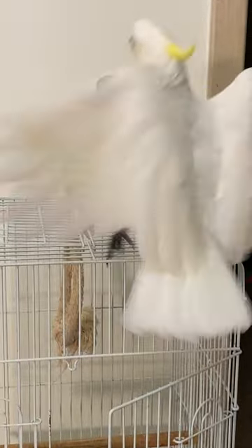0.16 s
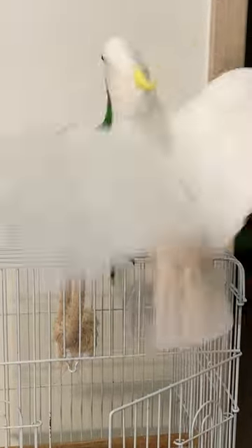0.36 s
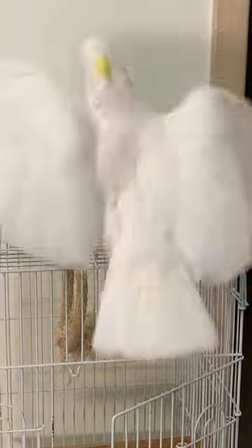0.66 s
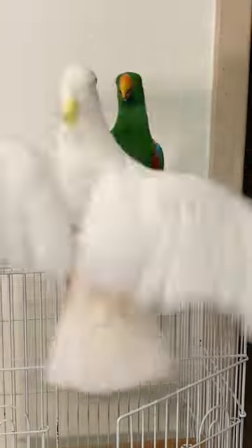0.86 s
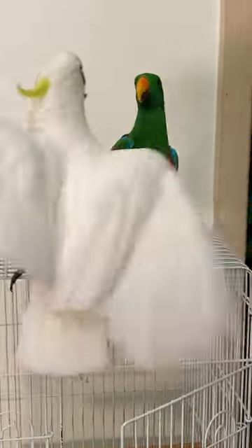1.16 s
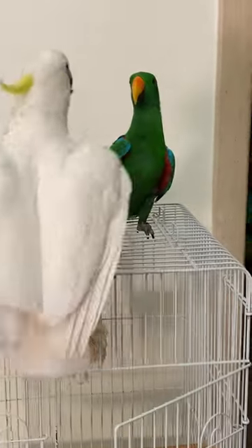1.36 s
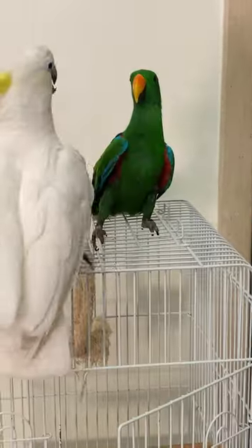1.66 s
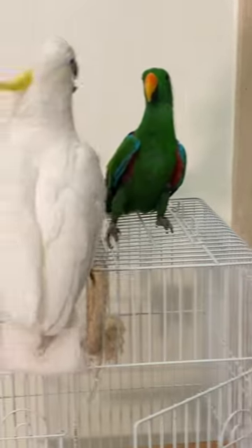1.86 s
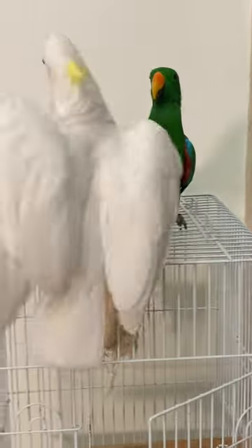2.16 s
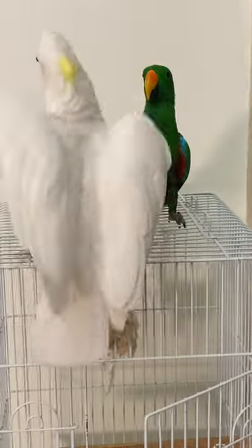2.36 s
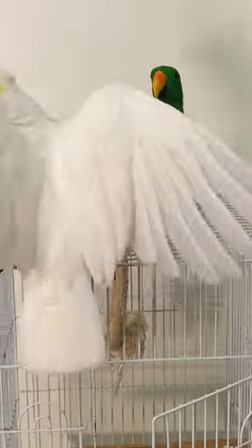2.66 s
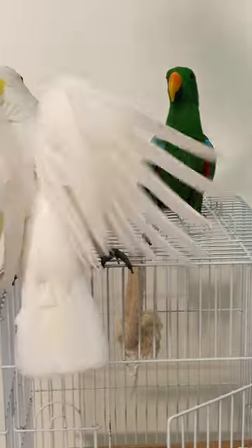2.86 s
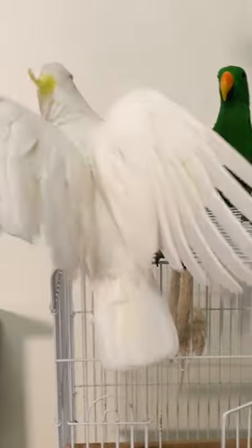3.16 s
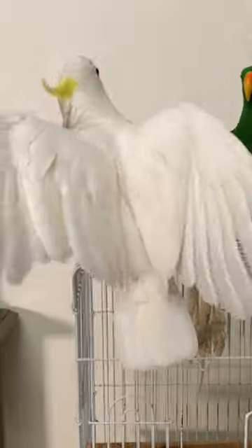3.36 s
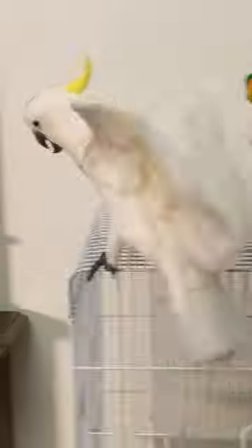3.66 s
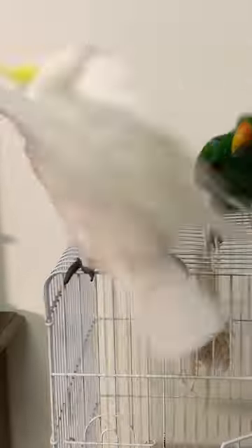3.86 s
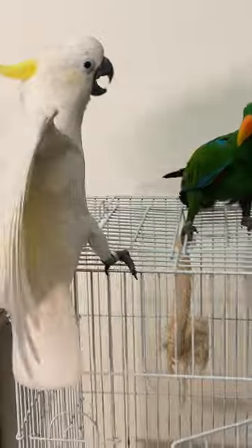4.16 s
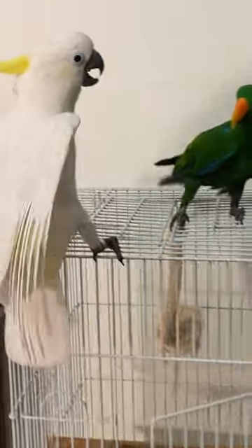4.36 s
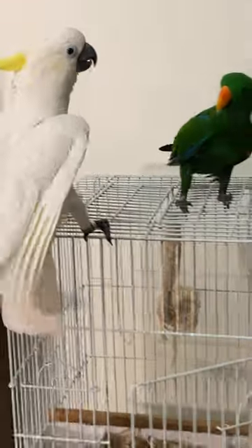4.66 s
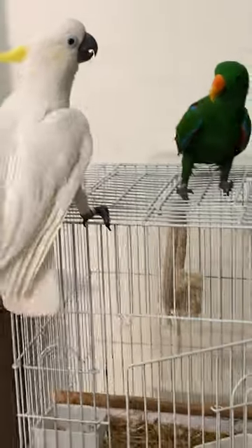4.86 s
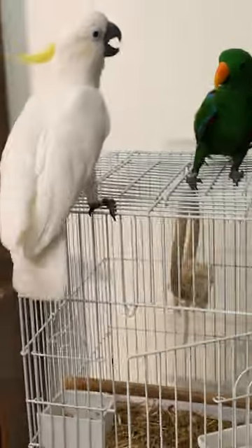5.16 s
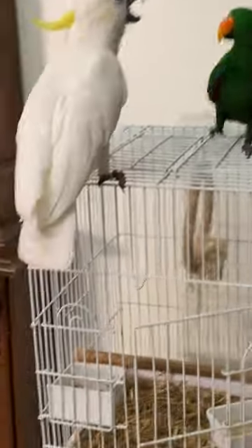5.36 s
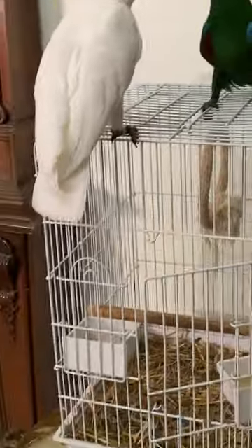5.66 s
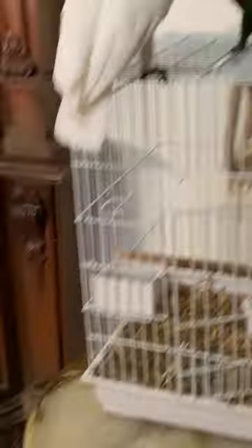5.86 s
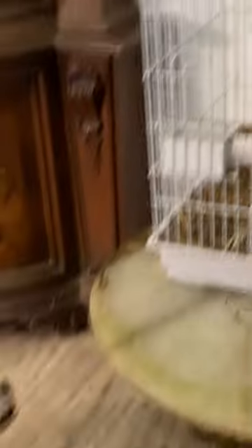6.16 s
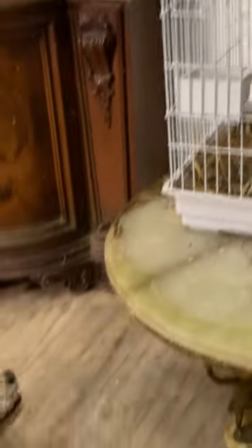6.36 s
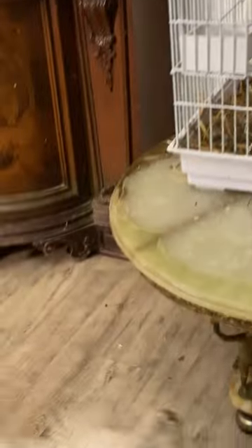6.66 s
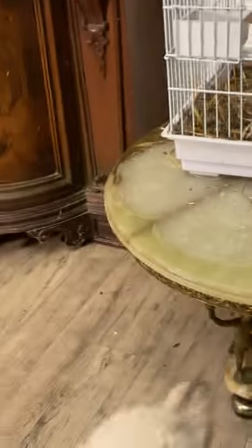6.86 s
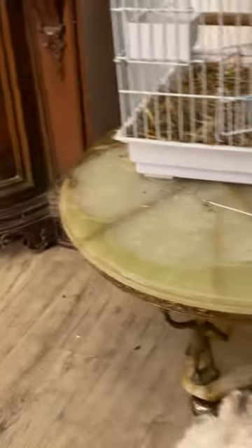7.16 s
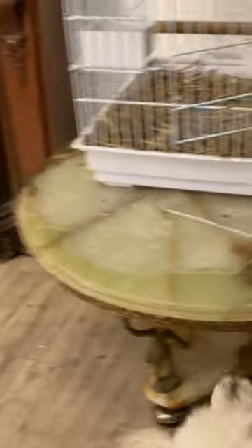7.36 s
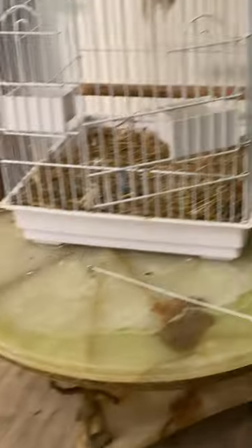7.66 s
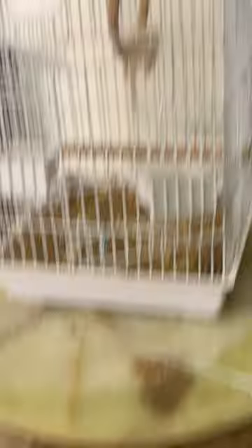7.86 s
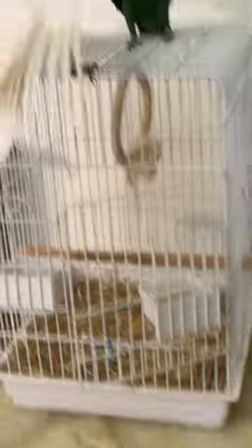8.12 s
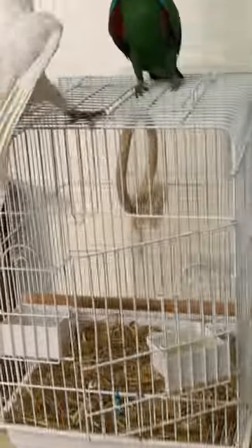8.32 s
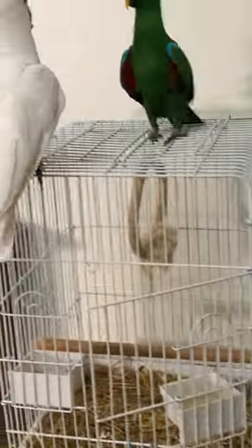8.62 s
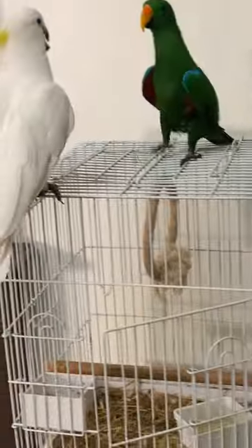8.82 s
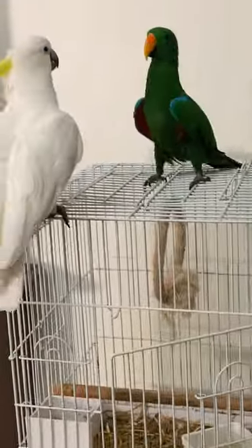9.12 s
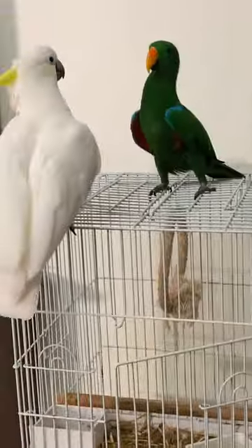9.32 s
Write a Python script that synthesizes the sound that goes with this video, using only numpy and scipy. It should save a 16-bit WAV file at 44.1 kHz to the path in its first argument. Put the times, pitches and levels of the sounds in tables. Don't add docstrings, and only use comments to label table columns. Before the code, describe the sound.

A large parrot on a wire cage screeches harshly in two bouts, with tiny dog yips in the pause and one last clearer scream.

```python
import sys
import numpy as np
from scipy import signal
from scipy.fft import rfft, irfft, next_fast_len
from scipy.io import wavfile
from scipy.ndimage import uniform_filter1d

SR = 44100
rng = np.random.default_rng(int(sys.argv[2]) if len(sys.argv) > 2 else 0)


def level_to_linear(level):
    exponent = np.asarray(level, float) / 20
    return 10 ** exponent


def dump(signal):
    limited = np.clip(np.atleast_2d(signal).T, -1, 1)
    pcm = np.round(limited * 32767).astype(np.int16)
    wavfile.write(sys.argv[1], SR, pcm)


N = 418509

# frequency_hz, density_db [dB per Hz]
HUSH_SPECTRUM = [(30, -45), (60, -12.5), (120, -3.5), (300, -6), (600, -8.5), (1000, -15.5), (2000, -14.5),
                 (4000, -19), (8000, -23), (15000, -28.5)]
# time_s, level_db
HUSH_LEVEL = [(0, -65), (2.5, -69), (4.2, -74), (7, -61.5), (9.2, -71.5), (9.49, -80.5)]
HUM_HZ, HUM_DB = 50.4, -71.5

# start_s, length_s, opening_db, push_s [after the start], push_db
SCREECHES = [ (0.088, 0.33697, -26, .32, -16), (0.56, 0.27842, -23.5, 0.26, -17.5),
             (1.03, 0.33704, -23, 0.092, -24.5), (1.55, 0.55622, -27.5, 0.4635, -22),
             (2.265, 0.4032, -20.5, 0.038, -20), (2.815, 0.41065, -23.5, 0.24, -22.5),
             (3.53, 0.53465, -25, 0.35007, -17.5), (5.19, 0.36793, -18, .32, -19),
             (5.74, 0.25057, -20.5, 0.17, -18), (6.14, 0.34837, -21.5, 0.4, -16.5),
             (6.62, 0.44704, -24.5, 0.28, -20.5), (7.185, 0.3703, -20.5, 0.097, -19),
             (7.68, 0.35889, -21.5, .26, -18.5)]
# [per s, lower voice]
VOICES = [ (0.029, 2030, 2600, -28.5, -0.5), (0.016, 2010, 2550, -26, 1), (0.026, 2060, 2620, -25, -18),
          (0.0084, 2120, 2600, -18, 5), (0.024, 2120, 2700, -17, -18), (0.019, 2140, 2950, -21.5, 0),
          (.045, 2200, 2700, -16.5, -10.5), (0.07757, 2130, 2880, -23, -15),
          (.022, 2180, 1900, -24.5, -8.5), (0.032, 2130, 2400, -7, -52.5), (0.017, 2080, 2300, -20, -5.5),
          (0.026, 2170, 2200, -21.5, -8.5), (0.0505, 2200, 2750, -13, -26)]
# chest_db [under 900 Hz], rasp_db [over 4 kHz], pipe_hz, pipe_db
COLOURS = [(4.5, -0.0147, 3900, -7.5), (9, 4.1447, 2600, 1.5), (6.5, -0.0246, 4050, -3.5),
           (2.5, 0.2614, 4100, -5), (1.713, -2, 3800, -5), (-0.16, -1.3431, 4200, -1.5),
           (0, 0.9364, 4150, 0.5), (-1.6482, -1.42, 4100, 1.5), (2.7626, 0.9178, 3900, -1.5),
           (4.5, 2.43, 4050, 0), (5, 1.8216, 3900, -7.5), (2.5, 2.5, 4150, -7.5), (0, 2.5, 4072, 2.5),
           (-1.5, 0.3087, 4070, -4)]
# frequency_hz, density_db [dB per Hz]
THROAT = [(150, -48.5), (300, -30), (500, -22.5), (800, -9.5), (1250, -10), (1650, -9), (1950, -7),
          (2800, -0.5), (3600, -6.5), (4200, -13), (5000, -17), (6000, -15), (9000, -18.5), (15500, -42)]
ONSET_DB, PUSH_POWER, SAG_DB_PER_S, RELEASE_S, RELEASE_DB = -13, 3.9306, -16.5, 0.05065, -13.5
HOP_S = 0.065
UPPER_HOP_HZ, BEAK_HOP_HZ, LOWER_HOP_HZ = 84.929, 170.03, 39.907
LOWER_HZ = 1169.5
SECOND_DB, SECOND_FADE_DB = -6.5, -8.5
BEAK_DB, PARTIAL_SWING_DB = -11, 2.5
SLACK_DB, SLACK_S = 10.5, 0.034

# start_s, peak_db, pitch_hz
CLUCKS = [(0.093, -37, 449.6), (0.79, -26, 763.6), (1.565, -36, 409.4), (2.104, -37.5, 420.3),
          (2.271, -35.5, 392.3), (2.819, -33, 420.5), (3.544, -34.5, 406), (5.2, -34, 524.6),
          (5.234, -27.5, 551.8), (5.744, -40, 371.2), (6.148, -36, 384.5), (8.367, -47, 552.4)]
# start_s, peak_db, pitch_hz
WINGS = [(1.053, -51.5, 91.83), (1.451, -51, 96.97), (1.582, -44.5, 119.5), (2.029, -58, 145.1),
         (2.666, -46, 121.3), (2.834, -61, 145.1), (3.062, -43.5, 130), (3.524, -45.5, 191),
         (3.796, -48.5, 96.9), (4.588, -53, 110.8), (5.32, -47.5, 185.5), (5.593, -57.5, 116),
         (6.312, -46.5, 128.5), (6.722, -50.5, 106.8), (7.096, -51, 105.9), (7.201, -55, 182.2),
         (7.9, -66.5, 173.6)]

# start_s, length_s, effort_db, top_hz, upper_db [orders above the second]
YIPS = [
    (4.495, .085, -44, 600, 8),
    (5.0, .056, -40, 542, 5),
]
# multiple [of the pitch], level_db
YIP_ORDERS = [(1, 3), (2, -5.5), (3, -22), (4, -21.5), (5, -27), (6, -25.5), (7, -40.5), (8, -49),
              (9, -56.5)]
YIP_START_HZ, YIP_RISE, YIP_ATTACK_S, YIP_FADE_DB = 450.2, 0.22, 0.014, -17

# start_s, peak_db
CLAWS = [
    (4.497, -48),
    (4.532, -43),
    (4.622, -50),
    (5.24, -37.5),
    (7.69, -34.5),
]

# time_s, effort_db, lower_db [lower voice re effort]
SCREAM_BREATH = [(8.345, -42, -15), (8.362, -40.5, -7.5), (8.398, -29, 4.5), (8.5, -28.5, -16),
                 (8.601, -24.5, -39), (8.683, -28.5, -11.5), (8.72, -23.5, -21.5), (8.79, -24.5, -15.5),
                 (8.92, -38.5, -9)]
# time_s, pitch_hz
SCREAM_PITCH = [(8.345, 980), (8.4, 1105), (8.55, 1060), (8.655, 995), (8.695, 1038), (8.73, 1010),
                (8.77, 1024), (8.835, 990), (8.865, 1032)]
# time_s, roughness [0-1]
SCREAM_ROUGHNESS = [(8.345, .85), (8.4, .55), (8.55, .56), (8.64, .42), (8.695, .18), (8.85, .13),
                    (8.885, .3), (8.92, .55)]
# time_s, pitch_hz, level_db [re effort]
SCREAM_WHISTLE = [(8.345, 5550, -22.5), (8.42, 5704, -9), (8.62, 6060, -13), (8.69, 6033, -20.5),
                  (8.92, 6140, -36.5)]
DROP_AT_S, DROP_HZ_PER_S = 8.876, 11500

# frequency_hz, t60_s
ROOM_DECAY = [(250, 0.42), (550, 1), (1000, 0.74365), (1700, 0.73777), (4600, 0.59582), (9000, 0.4676),
              (15000, 0.31964)]
# frequency_hz, level_db
PORT_SUM = [(100, -1.5), (4300, 0.5), (5000, 0.5), (7000, -5), (8200, -14), (9200, -28.5), (11600, -14),
            (12600, -14), (15000, -6.5)]
# frequency_hz, level_db, likeness [to the sum, 0-1], lead [turns]
PORT_DIFFERENCE = [(170, -34.5, .1, .15), (330, -16, .6, .1), (550, -7, .8, .05), (863.03, -4, .45, 0),
                   (1200, 1.9522, 0.6, -0.19), (1500, -3, .3, -.28), (1750, -9.5, .15, .25),
                   (2100, -12, .85, .25), (2700, -5.5, 1, .25), (3600, -13, .87, .25),
                   (4500, -2.5, .93, .25), (5200, 1, 1, 0.251), (11000, -3.5, .9, .25),
                   (15000, -8.5, .6, .25)]


def evened(x):
    return x / np.sqrt(np.mean(x ** 2) + 1e-20)


def read(points, hz, axis=1):
    table = np.transpose(points)
    return np.interp(np.log(hz + 1), np.log(table[0] + 1), table[axis])


def curves(rows):
    s, *columns = np.transpose(rows)
    t = np.arange(s[0], s[-1], 1 / SR)
    return [np.interp(t, s, column) for column in columns]


def coloured(x, gain):
    size = next_fast_len(len(x) + 2048)
    spectrum = rfft(x, size) * gain(np.fft.rfftfreq(size, 1 / SR))
    return irfft(spectrum, size)[:len(x)]


def add(mix, s, sound):
    part = mix[round(s * SR):][:len(sound)]
    part += sound[:len(part)]


def wander(count, hz):
    r = np.exp(-2 * np.pi * hz / SR)
    drift = signal.lfilter([1], [1, -2 * r, r * r], rng.standard_normal(count + 4000))
    return evened(drift[4000:])


def background():
    hush = np.array([coloured(rng.standard_normal(N), lambda hz: level_to_linear(read(HUSH_SPECTRUM, hz)))
                     for _ in range(2)])
    level_db = np.interp(np.arange(N) / SR, *np.transpose(HUSH_LEVEL)) + 1.4 * wander(N, 3)
    hum_turns = np.cumsum(HUM_HZ + 3.0 * wander(N, 3)) / SR
    hum = np.cos(2 * np.pi * hum_turns) * level_to_linear(HUM_DB + 1.8 * wander(N, 3))
    return level_to_linear(level_db) * evened(hush) + hum


def effort(t, length, opening_db, push_s, push_db, attack_s):
    swell_db = opening_db + (push_db - opening_db) * np.minimum(t / push_s, 1) ** PUSH_POWER
    attack_db = ONSET_DB / (1 + (t / attack_s) ** 2.9476)
    sag_db = SAG_DB_PER_S * np.maximum(t - push_s, 0)
    ending_db = RELEASE_DB * np.maximum(1 - (length - t) / RELEASE_S, 0)
    return swell_db + attack_db + sag_db + ending_db


def hops(t, centre_hz, spread_hz):
    stay, step = rng.random((2, 24))
    ends_s = np.cumsum(HOP_S * (0.3 + 1.4 * stay))
    which = np.minimum(np.searchsorted(ends_s, t), 23)
    held_hz = centre_hz + spread_hz * np.sqrt(12) * (step[which] - 0.5)
    return uniform_filter1d(held_hz, size=300)


def syrinx(hz, rough, jitter, flutter_db, odd=1):
    count = len(hz)
    rough = np.clip(rough, 0, 1)
    slips = jitter * rough * wander(count, 60) + 0.004 * wander(count, 25)
    turns = np.cumsum(hz * (1 + slips)) / SR
    pulses = sum(odd ** (k % 2) * np.cos(2 * np.pi * k * turns + k * k / 2) for k in range(2, 15))
    beat = 2 * np.pi * np.cumsum(hz * (0.2 + 0.05 * wander(count, 15.823))) / SR
    pulses = pulses * (1 + 1.8 * rough * (np.cos(beat) + 0.7 * np.cos(2 * beat)))
    puffs = (0.4 + np.exp(-(turns % 1) / 0.5)) * rng.standard_normal(count)
    flutter = level_to_linear(flutter_db * rough * wander(count, 140))
    return evened(flutter * (np.sqrt(1 - rough ** 2) * evened(pulses) + rough * evened(puffs)))


def resonate(x, hz, width_hz):
    turn = np.exp(2j * np.pi * np.cumsum(hz * np.ones(len(x))) / SR)
    r = np.exp(-np.pi * width_hz / SR)
    return 2 * (turn * signal.lfilter([1 - r], [1, -r], x / turn)).real


def throat(drive, chest_db=0, rasp_db=0, pipe_hz=4000, pipe_db=-20):
    def gain(hz):
        chest = chest_db / (1 + (hz / 950) ** 6)
        rasp = rasp_db / (1 + (4000 / (hz + 1)) ** 6)
        return level_to_linear(read(THROAT, hz) + chest + rasp)

    pipe = resonate(drive, pipe_hz, 440) + resonate(drive, 1.36 * pipe_hz, 380)
    return evened(coloured(drive + level_to_linear(pipe_db) * pipe, gain))


def whistle(hz, width_hz):
    turns = np.cumsum(hz + width_hz * wander(len(hz), 89.828)) / SR
    return evened(level_to_linear(4.4 * wander(len(hz), 50)) * np.cos(2 * np.pi * turns))


def screech(shape, voice, colour):
    attack_s, upper_hz, beak_hz, lower_db, fading_db = voice
    length = shape[0]
    t = np.arange(0, length, 1 / SR)
    effort_db = effort(t, *shape, attack_s)
    second_db = SECOND_DB + PARTIAL_SWING_DB * wander(len(t), 10) + SECOND_FADE_DB * t / length
    beak_db = BEAK_DB + PARTIAL_SWING_DB * wander(len(t), 10)
    lower_db = lower_db + PARTIAL_SWING_DB * wander(len(t), 10)
    lower_db = lower_db + SLACK_DB * np.exp(-t / SLACK_S) + fading_db * t

    tensing = 1 - 0.15 * np.exp(-t / 0.01)
    upper_hz = tensing * hops(t, upper_hz, UPPER_HOP_HZ)
    beak_hz = hops(t, beak_hz, BEAK_HOP_HZ)
    lower_hz = tensing * uniform_filter1d(hops(t, LOWER_HZ, LOWER_HOP_HZ), size=6000)

    rough = 0.62 + 0.11 * wander(len(t), 14)
    drive = syrinx(upper_hz / 2, rough, jitter=0.03, flutter_db=1.6, odd=0.72)
    beak = evened(resonate(drive, beak_hz, width_hz=300)) + level_to_linear(-1.5) * whistle(beak_hz, 80)
    sound = throat(drive, *colour) + level_to_linear(beak_db) * beak
    sound += level_to_linear(second_db) * whistle(upper_hz, 70)
    sound += level_to_linear(lower_db + 1.5) * whistle(lower_hz, 45)
    return level_to_linear(effort_db - 3.5) * sound * signal.windows.tukey(len(t), 0.06)


def puff(db, hz, cycles, glide):
    u = np.arange(0, cycles, hz / SR) / cycles
    hump = np.sin(np.pi * u ** 0.79) ** 2
    return level_to_linear(db) * hump * np.sin(2 * np.pi * cycles * (u + glide * (u * u - u)))


def cluck(db, hz):
    return sum(puff(db - 4.6 * k, hz * (k + 1), cycles=7.4 * (k + 1), glide=0.27) for k in range(4))


def wing_beat(db, hz):
    return puff(db - 3.5, hz, cycles=3.6, glide=-0.3)


def yip(length, top_db, top_hz, upper_db):
    t = np.arange(0, length, 1 / SR)
    hz = top_hz + (YIP_START_HZ - top_hz) / (1 + (t / (YIP_RISE * length)) ** 2.6)
    effort_db = top_db + YIP_FADE_DB * (t / length) ** 3
    turns = np.cumsum(hz * (1 + 0.013 * wander(len(t), 120))) / SR
    stack = sum(level_to_linear(db + upper_db * (k > 2)) * np.cos(2 * np.pi * k * turns) for k, db in YIP_ORDERS)
    breath = level_to_linear(upper_db - 24.5) * evened(throat(rng.standard_normal(len(t))))
    attack = np.sqrt(np.minimum(t / YIP_ATTACK_S, 1))
    return level_to_linear(effort_db) * (stack + breath) * attack * signal.windows.tukey(len(t), 0.12)


def claw(db):
    t = np.arange(0, 0.02, 1 / SR)
    bright = evened(np.diff(rng.standard_normal(len(t) + 1)))
    return level_to_linear(db - 60 * t / 0.012) * bright


def scream():
    effort_db, lower_db = curves(SCREAM_BREATH)
    rough, = curves(SCREAM_ROUGHNESS)
    high_hz, high_db = curves(SCREAM_WHISTLE)
    t = SCREAM_BREATH[0][0] + np.arange(len(rough)) / SR
    hz = np.interp(t, *np.transpose(SCREAM_PITCH))
    hz = hz - DROP_HZ_PER_S * np.maximum(t - DROP_AT_S, 0)
    hz = hz * (1 + 0.006 * wander(len(hz), 30))
    drive = syrinx(hz, rough, jitter=0.022, flutter_db=2.2, odd=0.42)
    voice = throat(drive, *COLOURS[-1])
    voice += 1.5516 * rough * whistle(2 * hz, 45.94)
    voice += level_to_linear(high_db) * whistle(high_hz, 90)
    voice += level_to_linear(lower_db - 4.0) * whistle(hz * (1 + 0.05 * rough), 24)
    return level_to_linear(effort_db - 3.0) * voice * signal.windows.tukey(len(hz), 0.05)


def room(x):
    taps = np.zeros((2, SR))
    at = np.arange(200, SR - 20, 20) + rng.integers(0, 20, (2, (SR - 201) // 20))
    np.put_along_axis(taps, at, rng.choice([-1., 1.], at.shape), 1)
    hz, t, z = signal.stft(taps, SR, nperseg=256)
    decay = level_to_linear(-60 * t / read(ROOM_DECAY, hz)[:, None])
    tail = signal.istft(z * decay, SR, nperseg=256)[1]
    return signal.fftconvolve(x[None], tail / np.linalg.norm(tail[0]), axes=1)[:, :N]


def scene():
    direct = np.zeros(N)
    for (s, *shape), voice, colour in zip(SCREECHES, VOICES, COLOURS):
        add(direct, s, screech(shape, voice, colour))
    for s, db, hz in CLUCKS:
        add(direct, s, cluck(db - 5.0, hz))
    for s, db, hz in WINGS:
        add(direct, s, wing_beat(db, hz))
    for s, *shape in YIPS:
        add(direct, s, yip(*shape))
    for s, db in CLAWS:
        add(direct, s, claw(db))
    add(direct, SCREAM_BREATH[0][0], scream())
    wet = room(direct)
    return np.array([direct + level_to_linear(-2.0) * wet[0], level_to_linear(-1.0) * wet[1]]) + background()


def top_cut(x):
    return signal.sosfilt(signal.butter(12, 15740, fs=SR, output="sos"), x)


def record(dry):
    near, diffuse = dry

    def alike(hz):
        return np.clip(read(PORT_DIFFERENCE, hz, axis=2), 0, 1)

    def level(hz):
        return level_to_linear(read(PORT_DIFFERENCE, hz))

    def lead(hz):
        return np.exp(2j * np.pi * read(PORT_DIFFERENCE, hz, axis=3))

    mid = coloured(near, lambda hz: level_to_linear(read(PORT_SUM, hz)) * np.sign(10500 - hz))
    side = coloured(near, lambda hz: level(hz) * alike(hz) * lead(hz))
    side += coloured(diffuse, lambda hz: level(hz) * np.sqrt(1 - alike(hz) ** 2))
    return top_cut(np.array([mid + side, mid - side]))


dry = scene()
out = record(dry)
dump(out)
```